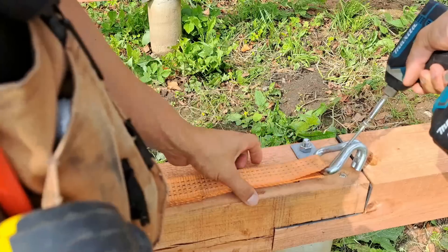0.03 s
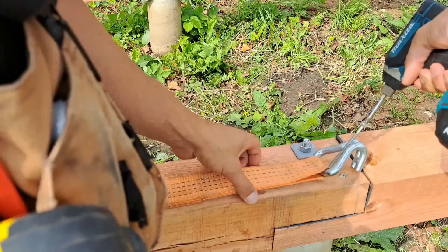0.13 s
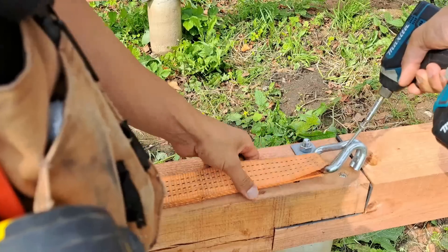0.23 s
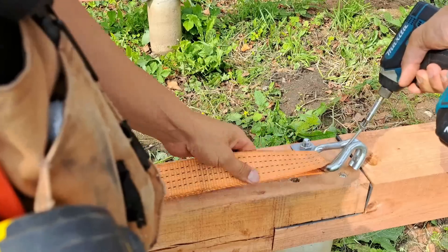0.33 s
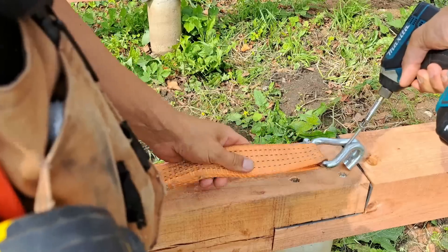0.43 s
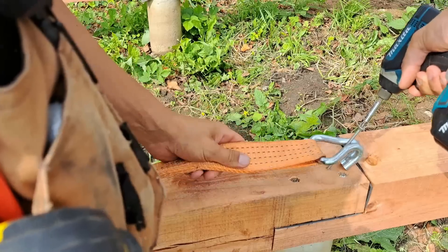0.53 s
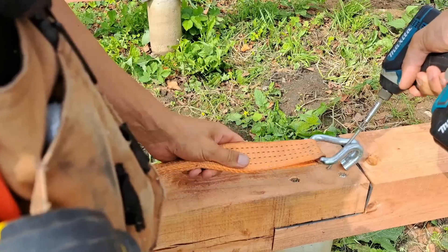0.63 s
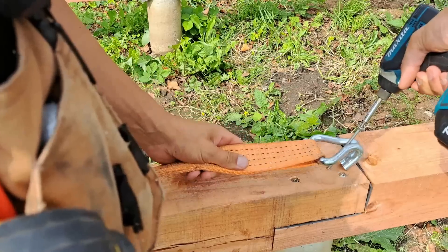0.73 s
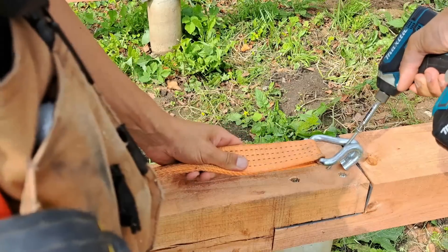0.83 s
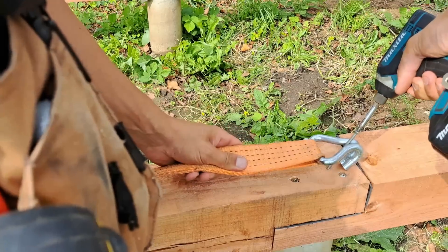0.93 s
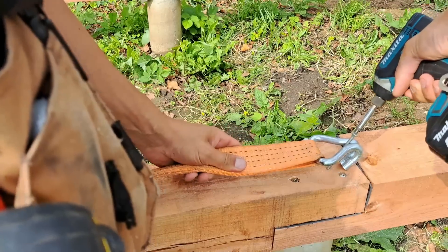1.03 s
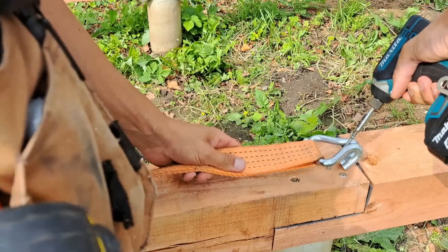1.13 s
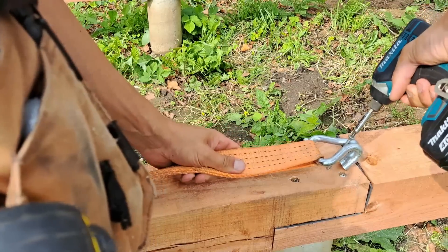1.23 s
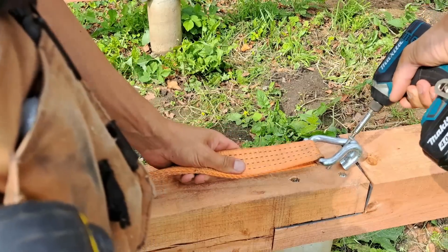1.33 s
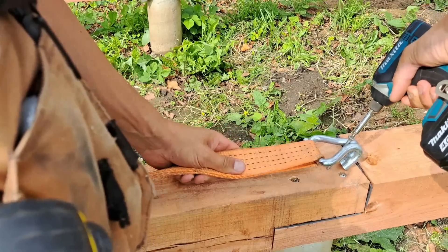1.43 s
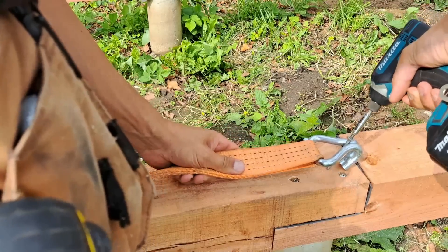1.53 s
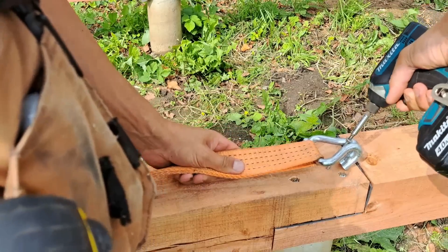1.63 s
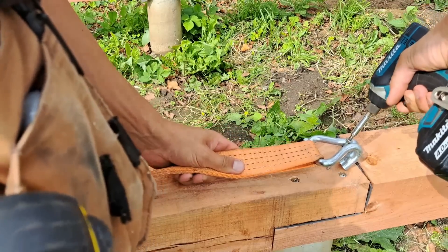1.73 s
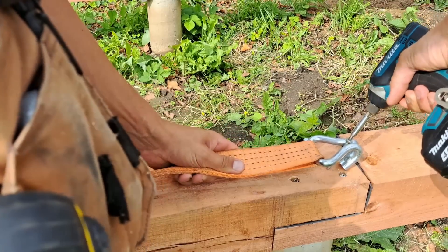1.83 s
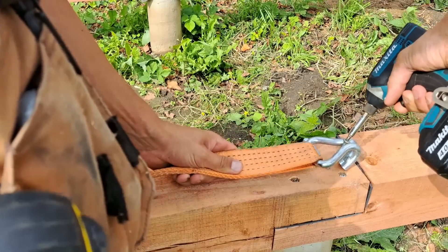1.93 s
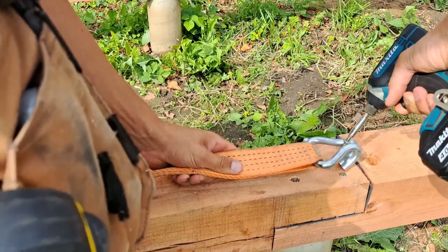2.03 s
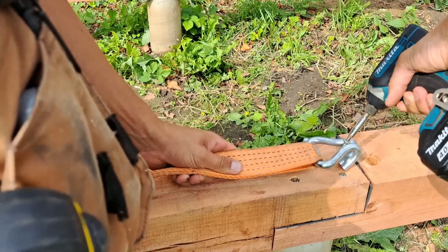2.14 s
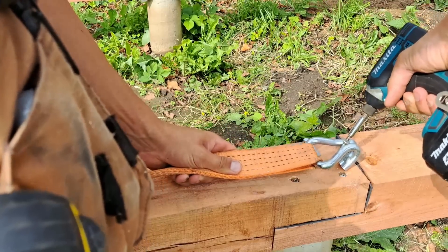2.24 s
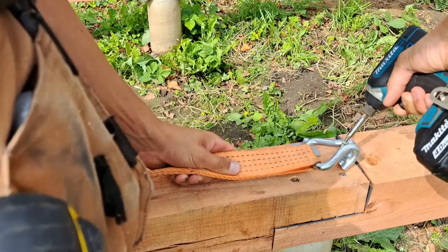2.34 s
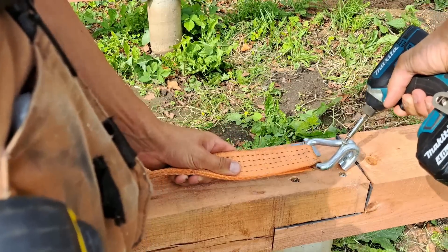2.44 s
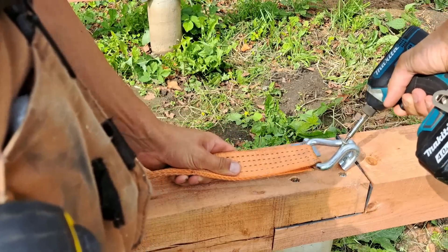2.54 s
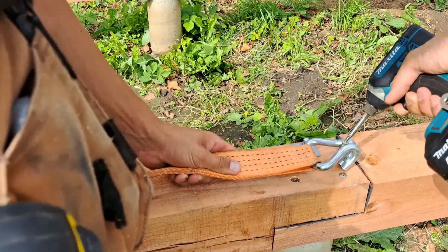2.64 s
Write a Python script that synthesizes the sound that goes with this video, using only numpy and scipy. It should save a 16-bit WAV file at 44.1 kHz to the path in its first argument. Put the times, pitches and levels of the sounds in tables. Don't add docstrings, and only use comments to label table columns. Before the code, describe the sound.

Impact driver, close and dry outdoors. A faint whirr dies at 0 s; a short rising whine spins at 0.2-0.35. Soft hand bumps around 0.4, then bright, clipping steel hammering, about 37 blows a second: 0.5-0.66, long 0.78-1.43, 1.55-1.76, 1.9-2.04, 2.27-2.42. Timber knocks mark starts and stops; gears tick down between and until 2.57. Low wind rumble, faint hiss, short ground echoes, wide stereo.

```python
import sys
import numpy as np
from scipy import signal
from scipy.fft import rfft, irfft, next_fast_len
from scipy.io import wavfile
from scipy.ndimage import uniform_filter1d, map_coordinates

SR = 44100
rng = np.random.default_rng(int(sys.argv[2]) if len(sys.argv) > 2 else 0)


def natural_amplitude(level_db):
    exponent = np.asarray(level_db, float) / 20
    return 10 ** exponent


def file_out(sig):
    cols = np.atleast_2d(sig).T
    lim = np.clip(cols, -1, 1)
    pcm = np.round(lim * 32767).astype(np.int16)
    wavfile.write(sys.argv[1], SR, pcm)


N = 119070

# (start [s], full load [s], release [s], silent [s], gear level [dB])
PULLS = [
    (-.1, -0.048, 0.0049, 0.065, -37.5),
    (0.157, 0.209, 0.3195, 0.367, -29),
    (0.469, 0.499, 0.664, 0.715, -25),
    (0.682, 0.69, 0.7556, 0.782, -36),
    (0.743, 0.793, 1.42, 1.47, -27),
    (1.531, 1.565, 1.766, 1.814, -29.5),
    (1.868, 1.922, 2.04, 2.1033, -27.5),
    (2.238, 2.277, 2.384, 2.433, -26),
    (2.415, 2.423, 2.53, 2.604, -45),
]
# (frequency [Hz], level [dB per Hz])
GEAR_COLOUR = [(180, -33), (300, -8), (1200, -13.5), (2500, 5), (5000, -0.5), (8500, -11), (11500, -5.5),
               (15000, -9), (16500, -36)]
# (time [s], peak [dB], brightest frequency [Hz])
KNOCKS = [(0, -30.5, 1610), (.405, -27.5, 3050), (.502, -10, 1510), (0.622, -15.5, 299),
          (0.646, -16.5, 896), (.672, -24.5, 300), (.802, -12, 1200), (1.352, -7, 1430),
          (1.405, -20, 500.1), (1.562, -13.5, 1356), (1.728, -7, 1306), (1.897, -23, 608),
          (2.022, -16.5, 919), (2.266, -18.5, 1020), (2.384, -11, 1492)]
# (frequency [Hz], width [Hz], level [dB])
BEAM_MODES = [(314.1, 31.14, -1), (415.1, 43, -10), (511.7, 48, -4.5), (708.5, 47.7, -1.5),
              (952.8, 42.4, -3), (1168.7, 67, -2), (1682.2, 146.5, -4.5)]
# (time [s], strength [dB])
WIND_LEVEL = [(0.0, -46), (0.08, -53), (0.46, -34.5), (0.56, -49), (0.76, -39.5), (1.12, -55),
              (1.32, -41.5), (1.35, -51.5), (1.43, -41), (1.47, -52), (1.77, -49.5), (1.84, -63.5),
              (2.1, -45.5), (2.12, -56), (2.32, -43), (2.42, -56.5), (2.47, -45), (2.7, -67.5)]
# (frequency [Hz], level [dB per Hz])
RUMBLE_COLOUR = [(15, -42.5), (25, -15), (55, 5.5), (263, -7), (472, -11.5), (786, -31.5), (900, -20),
                 (1170, -51), (1980, -120)]
# (frequency [Hz], level [dB per Hz])
AIR_COLOUR = [(290, -43), (500, -17), (631, -15), (3540, -18.5), (7420, -23), (16000, -31.5)]
# (time [s], level [dB])
AIR_LEVEL = [(0, -56), (.5, -51.5), (1.5, -54.5), (1.85, -61.5), (2.55, -64.5), (2.7, -68.5)]
# (centre time [s], peak [dB], frequency [Hz])
HAND_BUMPS = [(.055, -29, 300), (0.366, -27, 170), (.394, -17, 441), (.413, -17, 307), (.43, -15.5, 337),
              (0.438, -15, 222.7), (0.437, -19.5, 110), (.452, -23.5, 380), (.462, -22.5, 140),
              (.045, -35, 261), (1.487, -37, 342), (2.177, -34, 301.4), (2.484, -30.5, 126.8)]
# (time [s], peak [dB])
TRIGGER_CLICKS = [
    (0.149, -32.5),
    (0.4467, -26),
    (1.8482, -54.5),
    (2.209, -41),
]
# (time [s], frequency [Hz], level [dB])
FREE_SPIN = [
    (.2, 620, -50),
    (.215, 720, -30),
    (.235, 1000, -38),
    (.255, 1200, -30),
    (.29, 1280, -38),
    (.312, 1150, -33),
    (.335, 1000, -55),
]
# (centre time [s], length [s], frequency [Hz], level [dB])
MESH_TONES = [
    (.233, .014, 3130, -30),
    (.28, .036, 2550, -29),
]
# (time [s], peak [dB], body [dB])
LOOSE_TAPS = [
    (.407, -36.5, -6),
    (.465, -38, -17),
    (.805, -7, -15),
    (1.5654, -10.5, -16.5),
    (2.2775, -10.5, -14),
    (2.696, -52, -10.5),
]
# (time [s], peak [dB], body [dB])
SHORT_BURST_BLOWS = [(0.5037, -7, -9.5), (0.5222, -7.5, -15), (0.5494, -6.5, -16), (0.5776, -5, -17),
                     (0.6055, -4, -14), (0.6503, -13, -4), (0.6604, -16, -15), (1.5457, -12, -14.5),
                     (1.5743, -4, -16.5), (1.5997, -5, -24), (1.6258, -7, -17), (1.6515, -9.5, -14.5),
                     (1.6775, -2.5, -18.5), (1.705, -5.5, -17), (1.729, -7, -11.5), (1.7584, -14.5, -18),
                     (1.904, -13.5, -19.5), (1.9217, -8.5, -16.5), (1.947, -8, -16), (1.9725, -6.5, -15.5),
                     (1.9976, -6, -20), (2.0254, -6, -22.5), (2.0434, -13, -19), (2.2686, -13, -7.5),
                     (2.2853, -6, -14), (2.3086, -6.5, -15.5), (2.333, -6, -17.5), (2.357, -3, -17),
                     (2.385, -6, -13.5), (2.4214, -16, -17)]
# (time [s], peak [dB],
# body [dB])
COAST_TICKS = [(.6875, -23.5, -8), (.702, -26, -13.5), (.7162, -29.5, -10.5), (.7285, -29, -13),
               (.741, -36, -12.5), (.7541, -30.5, -13), (.770, -31.5, -7.5), (1.4867, -39.5, -15.5),
               (1.5037, -44, -17), (1.516, -45, -16.5), (1.5306, -38.5, -15.5), (2.232, -45.5, -15.5),
               (2.433, -33.5, -12.5), (2.446, -36.5, -10.5), (2.459, -36.5, -9), (2.472, -37.5, -13.5),
               (2.4835, -37.5, -11), (2.498, -39, -12.5), (2.5105, -39, -13), (2.5245, -37.5, -12),
               (2.54, -41.5, -12), (2.555, -39.5, -13), (2.571, -43.5, -15.5)]
# (time [s], peak [dB], body [dB])
LONG_BURST_BLOWS = [(0.7849, -5, -18), (0.813, -4, -16.5), (0.8385, -5.5, -14), (0.8659, -6.5, -18),
                    (0.8929, -5, -19.5), (0.9205, -2, -22.5), (0.9476, -3.5, -18), (0.9753, -5.5, -15),
                    (1.0032, -3.5, -16.5), (1.0301, -3, -19.5), (1.058, -7, -17), (1.0856, -3, -20.5),
                    (1.1139, -6.5, -19.5), (1.1405, -6, -18.5), (1.1685, -6.5, -16.5),
                    (1.1956, -6.5, -16.5), (1.2223, -3, -18.5), (1.2494, -4, -22), (1.2765, -7, -18),
                    (1.304, -6.5, -16.5), (1.3317, -4.5, -17.5), (1.3543, -9.5, -15.5), (1.3614, -7, -12.5),
                    (1.3977, -9.5, -12.5), (1.4064, -8, -17), (1.4252, -18, -16.5)]
# (frequency [Hz], level [dB], time to fall 60 dB [s])
STEEL_MODES = [(1866.5, -8.5, 0.0233), (2199, -10.5, 0.0328), (3283, -5, 0.02846), (3580, -8, 0.0249),
               (4252, -5.5, .02), (4935.3, 0.5, 0.02103), (5316, -4, 0.0227), (5708, -7.5, 0.02),
               (6264, -10, 0.032), (7132, -6, 0.02526), (9165, -15.5, 0.017), (10660, -14.5, 0.0083),
               (12248, -3.5, 0.018)]
# (frequency [Hz], level [dB])
CRACK_COLOUR = [(500, -51), (1500, -2.5), (3000, 4), (6000, 2.5), (8500, -2.5), (11000, 8.5), (16000, -6.5)]
# (delay [s], level [dB])
GROUND_ECHOES = [
    (.0011, 3),
    (.0026, -13),
    (.0047, -7),
    (.008, -11.5),
    (.014, -10),
]
# (frequency [Hz], share [0-1])
LEFT_OWN_SHARE = [(200, .2), (800, 0.2), (2000, 0.32), (5000, .55), (12000, .6)]


def unit(x):
    return x / np.sqrt(np.mean(x ** 2) + 1e-20)


def along(points, hz):
    f, db = np.transpose(points)
    return natural_amplitude(np.interp(np.log(hz + 1), np.log(f + 1), db))


def curve(rows):
    s, db = np.transpose(rows)
    return natural_amplitude(np.interp(np.arange(N) / SR, s, db, left=-120, right=-120))


def wobble(rate):
    points = rng.standard_normal(int(N * rate / SR) + 4)
    return map_coordinates(points, [np.arange(N) * rate / SR])


def filtered(x, response):
    n = x.shape[-1]
    m = next_fast_len(n + 8192)
    hz = np.fft.rfftfreq(m, 1 / SR)
    return irfft(rfft(x, m) * response(hz), m)[..., :n]


def rush(spectrum, patchy_db):
    z = signal.stft(rng.standard_normal(N), nperseg=256)[2]
    patches = uniform_filter1d(rng.standard_normal(z.shape), size=3, axis=0)
    patches = uniform_filter1d(patches, size=7, axis=1)
    noise = signal.istft(z * natural_amplitude(patchy_db * unit(patches)), nperseg=256)[1][:N]
    return unit(filtered(noise, lambda hz: along(spectrum, hz)))


def place(rows, sound):
    out = np.zeros(N + SR)
    for s, db, *traits in rows:
        x = sound(*traits)
        out[round(s * SR):][:len(x)] += natural_amplitude(db) * x / np.abs(x).max()
    return out[:N]


def fade(t, rise, t60):
    return (1 - np.exp(-t / rise)) * natural_amplitude(-60 * t / t60)


def gear_load():
    swing_db = 33
    return sum(curve([(start, db - swing_db), (full, db), (release, db), (silent, db - swing_db)])
               for start, full, release, silent, db in PULLS)


def gears(load):
    dull_hz = 2520
    grain = natural_amplitude(3.5 * (wobble(900) + 0.36 * wobble(90)))
    mesh = unit(grain * rush(GEAR_COLOUR, 4))
    dull = filtered(mesh, lambda hz: 1 / (1 + (hz / dull_hz) ** 2))
    return load * (dull + np.sqrt(load / load.max()) * (mesh - dull))


def beam(x):
    def response(f):
        return sum((-1) ** k * natural_amplitude(db) * 1j * f * width / (hz * hz - f * f + 1j * f * width)
                   for k, (hz, width, db) in enumerate(BEAM_MODES))
    return filtered(x, response)


def timber(load, hits):
    knock_db, whirr_db, blow_db = -1.5, -4.5, -17.5
    t = np.arange(SR // 10) / SR

    def knock(top_hz):
        push = fade(t, 0.0091, 0.0602) * rng.standard_normal(len(t))
        push = filtered(push, lambda f: 1j * f / (.3 * top_hz + 1j * f) / (1 + 1j * f / top_hz) ** 2)
        return beam(push)

    knocks = natural_amplitude(knock_db) * place(KNOCKS, knock)
    shake = uniform_filter1d(np.abs(hits), size=90) * rng.standard_normal(N)
    whirr = load * natural_amplitude(0.96 * wobble(40.35)) * rng.standard_normal(N)
    return knocks + 8 * beam(natural_amplitude(blow_db) * shake + natural_amplitude(whirr_db) * whirr)


def outdoors():
    alike, lump_db, port_db = 0.22, 2, -8
    shared, left, right = (natural_amplitude(lump_db * wobble(24.58)) * rush(RUMBLE_COLOUR, 2.1) for _ in range(3))
    rumble = unit(np.sqrt(alike) * shared + np.sqrt(1 - alike) * np.array([left, right]))
    wind = curve(WIND_LEVEL) * rumble * natural_amplitude([[port_db / 2], [-port_db / 2]])
    hiss = np.array([rush(AIR_COLOUR, 0.996), rush(AIR_COLOUR, 0.9)])
    return wind + curve(AIR_LEVEL) * hiss


def handling():
    cycles, bump_db = .9, -7
    t = np.arange(N) / SR
    return sum(natural_amplitude(db + bump_db) * np.exp(-((t - s) * hz / cycles) ** 2) * np.cos(2 * np.pi * hz * (t - s))
               for s, db, hz in HAND_BUMPS)


def trigger():
    ping_hz, hiss = 4974, 0.28
    t = np.arange(SR // 40) / SR

    def click():
        ping = 4.5 * np.sin(2 * np.pi * ping_hz * t)
        return fade(t, 0.0013, 0.0048) * (ping + hiss * rng.standard_normal(len(t)))

    return place(TRIGGER_CLICKS, click)


def whine():
    s, hz, db = np.transpose(FREE_SPIN)
    t = np.arange(N) / SR
    pitch = np.interp(t, s, hz) * (1 + 0.016 * wobble(60))
    turn = 2 * np.pi * np.cumsum(pitch) / SR
    tones = sum(natural_amplitude(level) * np.exp(-(2 * (t - centre) / length) ** 2) * np.sin(2 * np.pi * f * t)
                for centre, length, f, level in MESH_TONES)
    return curve(np.transpose([s, db])) * np.sin(turn) + tones


def contact(clash):
    ring_db, scatter_db, settle_db = -11.5, 6, -21
    rise, ring_life = .0007, .4
    t = np.arange(SR // 25) / SR
    crack, rattle = (clash[i:i + len(t)] for i in rng.integers(0, N - len(t), size=2))
    draws = rng.standard_normal((len(STEEL_MODES), 3))
    ring = 0
    for (hz, db, t60), (strength, detune, phase) in zip(STEEL_MODES, draws):
        tone = np.sin(2 * np.pi * hz * (1 + 0.02454 * detune) * t + 9 * phase)
        ring = ring + natural_amplitude(db + scatter_db * strength) * fade(t, rise, ring_life * t60) * tone
    crack = crack * fade(t, rise, .0055)
    return natural_amplitude(ring_db) * ring + crack + natural_amplitude(settle_db) * rattle * fade(t, rise, .03)


def weighted(x, body_db):
    corner_hz, usual_db = 3600, -17
    more = body_db - usual_db
    body, sheen = natural_amplitude(1.3 * more), natural_amplitude(-0.5 * more)
    return filtered(x, lambda f: (body + sheen * 1j * f / corner_hz) / (1 + 1j * f / corner_hz))


def blow(clash):
    late = round(.0013 * rng.uniform(.5, 1.8) * SR)
    first = np.pad(contact(clash), (0, late))
    return first + natural_amplitude(4 * rng.normal()) * np.pad(contact(clash), (late, 0))


def steel():
    clash = rush(CRACK_COLOUR, 2.1)
    blows = place(list(LONG_BURST_BLOWS) + list(SHORT_BURST_BLOWS),
                  lambda body_db: weighted(blow(clash), body_db))
    ticks = place(list(COAST_TICKS) + list(LOOSE_TAPS),
                  lambda body_db: weighted(contact(clash), body_db))
    return natural_amplitude(3) * (blows + ticks)


def ports(x, other):
    lag_s, left_db, echo_db, yard_db, yard_t60 = 0.00012216, -2, -11.5, -23, .11
    delay, db = np.transpose(GROUND_ECHOES)
    f, share = np.transpose(LEFT_OWN_SHARE)

    def own(hz):
        return np.clip(np.interp(np.log(hz + 1), np.log(f), share), 0, 1)

    left = filtered(x, lambda hz: np.sqrt(1 - own(hz))) + filtered(other, lambda hz: np.sqrt(own(hz)))
    t = np.arange(SR // 4) / SR
    out = []
    for y, lag, gain_db in ((left, lag_s, left_db / 2), (x, 0, -left_db / 2)):
        at = delay * rng.uniform(0.7995, 1.2, len(delay))
        sign = rng.choice([-1, 1], len(delay))

        def path(hz):
            echoes = np.exp(-2j * np.pi * np.outer(hz, at)) @ (sign * natural_amplitude(db + echo_db))
            return np.exp(-2j * np.pi * hz * lag) + echoes

        tail = rng.standard_normal(len(t)) * fade(t, 0.014, yard_t60)
        yard = signal.fftconvolve(y, tail / np.linalg.norm(tail))[:N]
        out.append(natural_amplitude(gain_db) * filtered(y, path) + natural_amplitude(yard_db) * yard)
    return np.array(out)


def scene():
    load = gear_load()
    near_hits = steel() + trigger()
    far_hits = steel() + trigger()
    near = near_hits + gears(load) + timber(load, near_hits)
    far = far_hits + gears(load) + timber(load, far_hits)
    return ports(near + whine() + handling(), far) + outdoors()


def roll_off(x):
    return signal.sosfilt(signal.butter(12, 16520, fs=SR, output="sos"), x)


def record(dry):
    top_hz = 15900
    clipped = np.clip(dry, -1, 1)
    mix = filtered(clipped, lambda hz: 1 / (1 + (hz / top_hz) ** 160))
    return roll_off(mix)


dry = scene()
out = record(dry)
file_out(out)
```